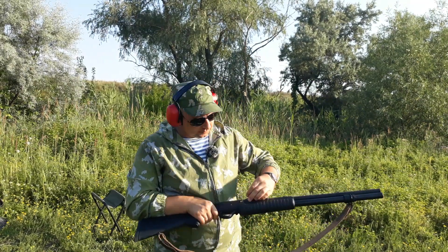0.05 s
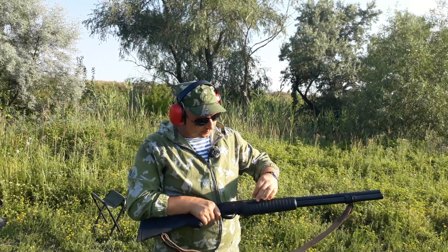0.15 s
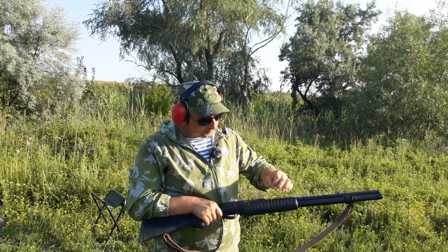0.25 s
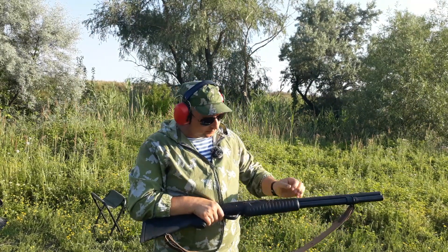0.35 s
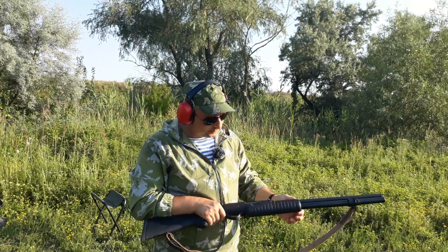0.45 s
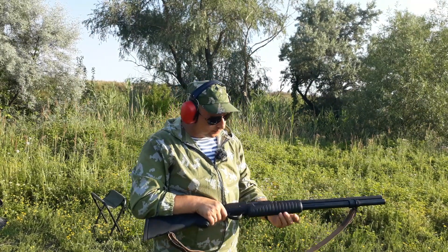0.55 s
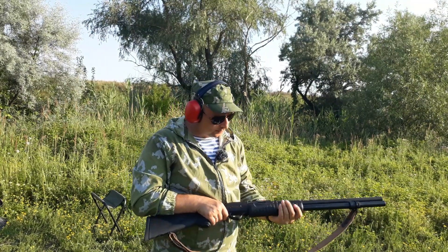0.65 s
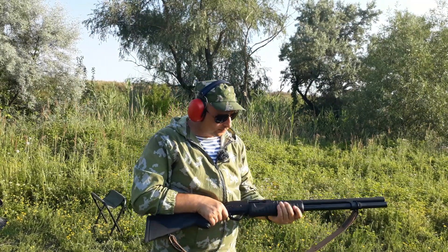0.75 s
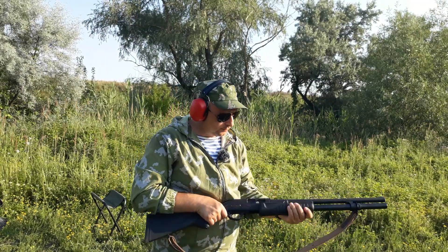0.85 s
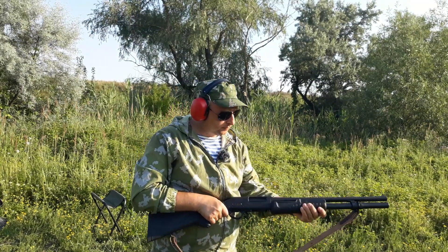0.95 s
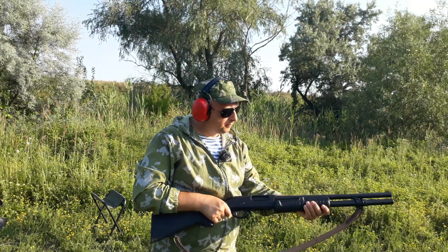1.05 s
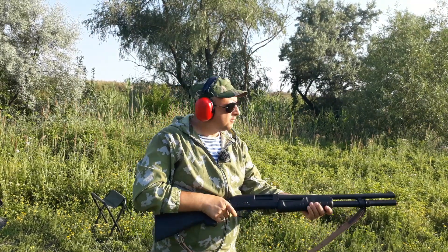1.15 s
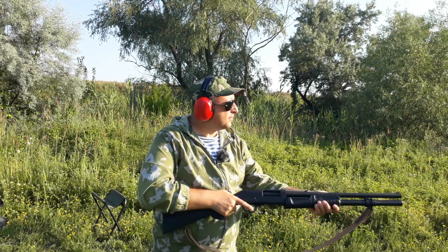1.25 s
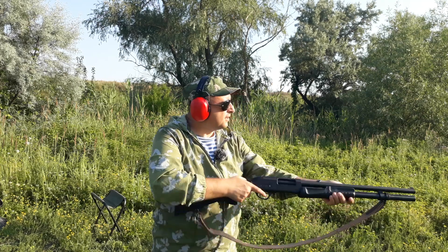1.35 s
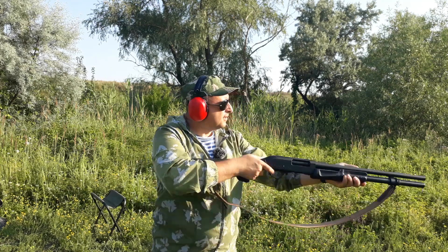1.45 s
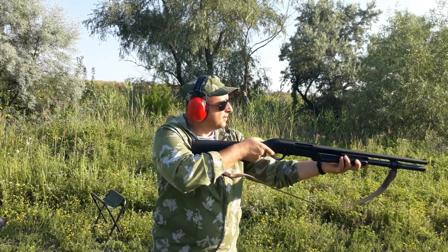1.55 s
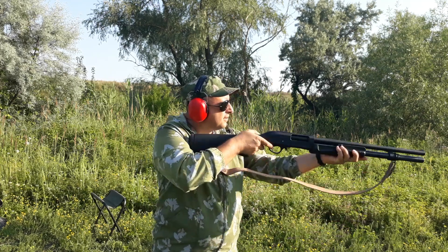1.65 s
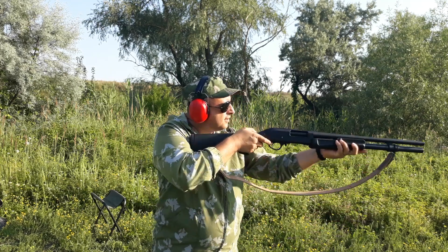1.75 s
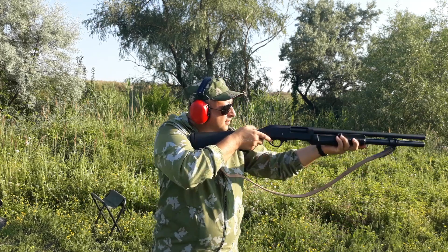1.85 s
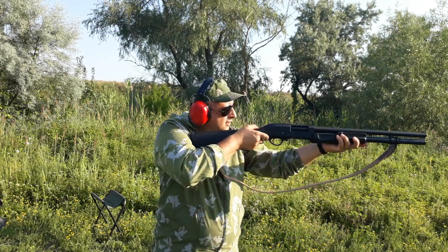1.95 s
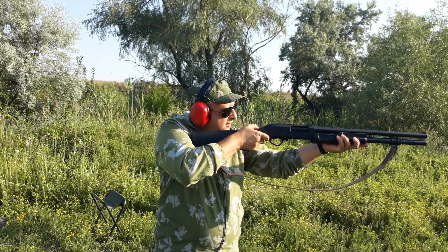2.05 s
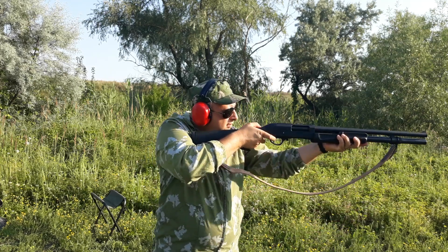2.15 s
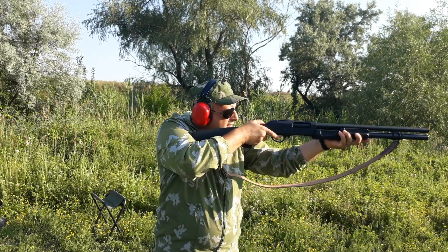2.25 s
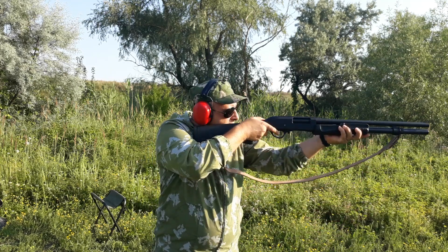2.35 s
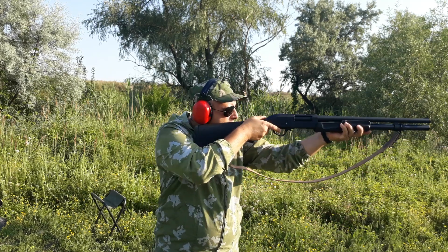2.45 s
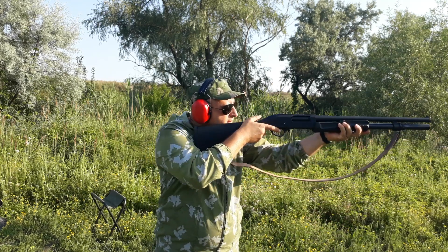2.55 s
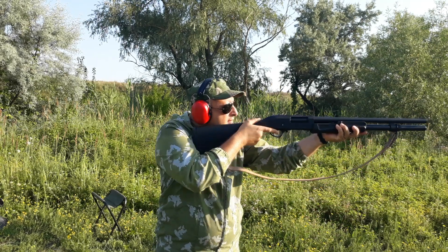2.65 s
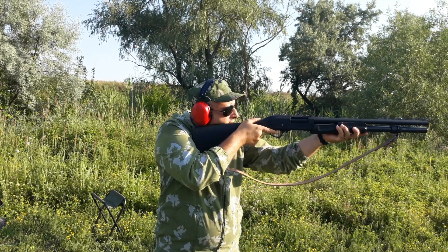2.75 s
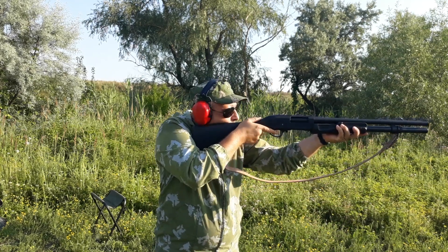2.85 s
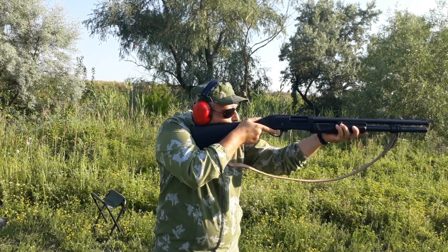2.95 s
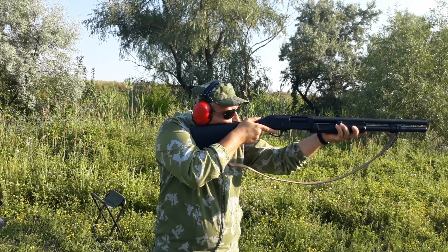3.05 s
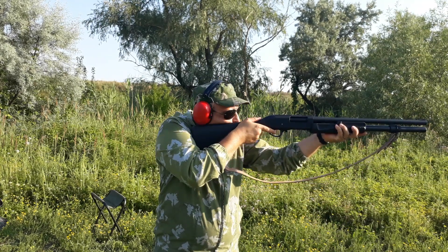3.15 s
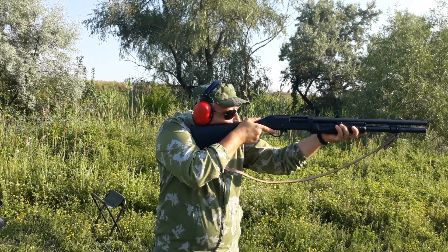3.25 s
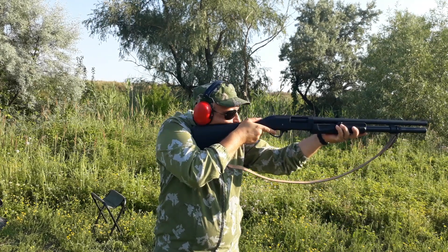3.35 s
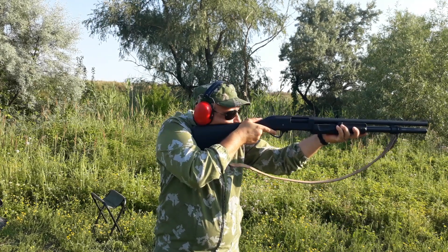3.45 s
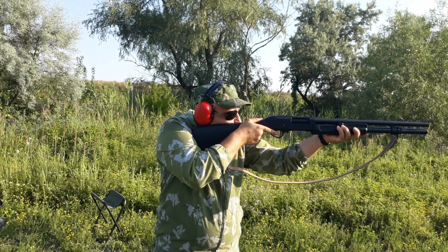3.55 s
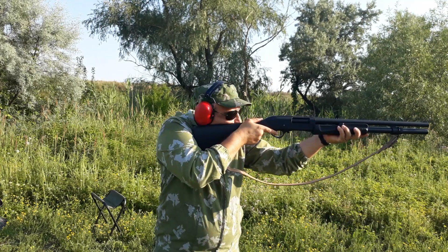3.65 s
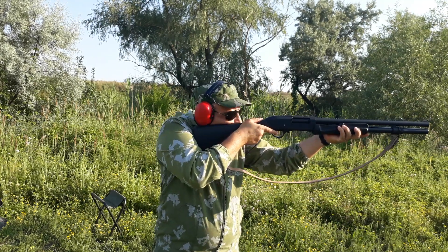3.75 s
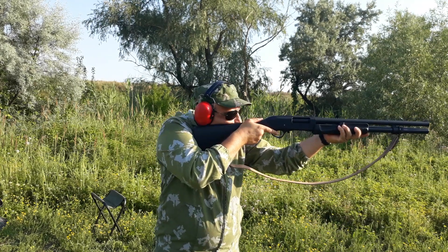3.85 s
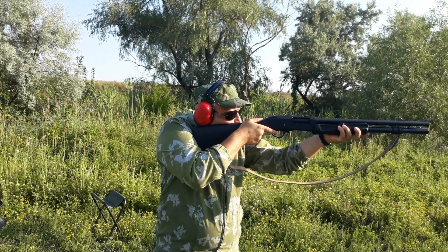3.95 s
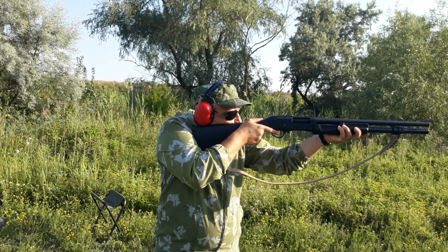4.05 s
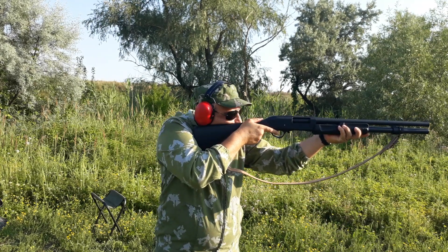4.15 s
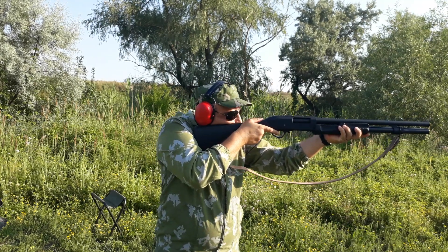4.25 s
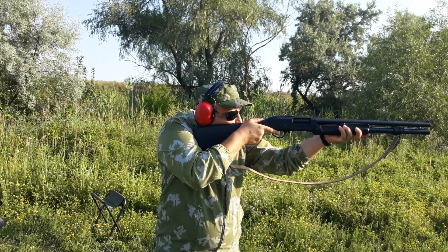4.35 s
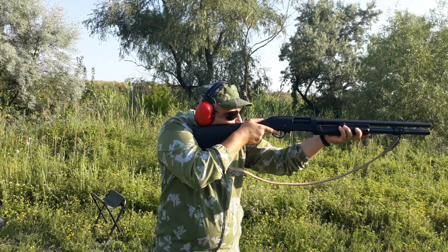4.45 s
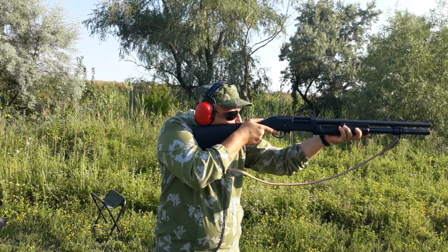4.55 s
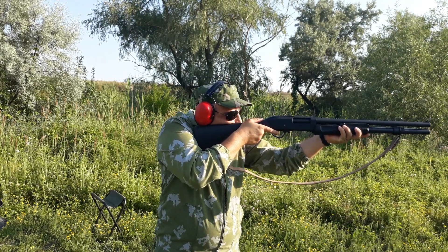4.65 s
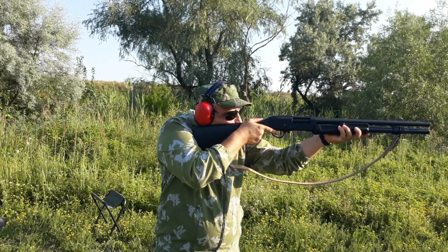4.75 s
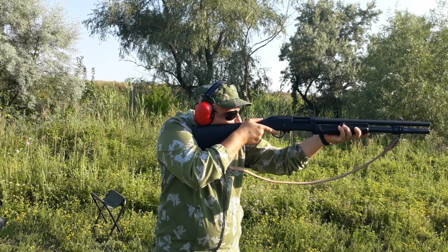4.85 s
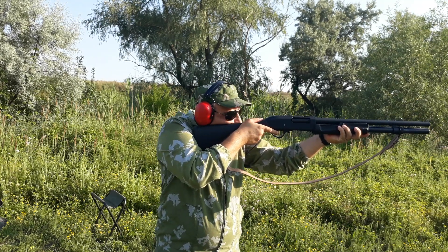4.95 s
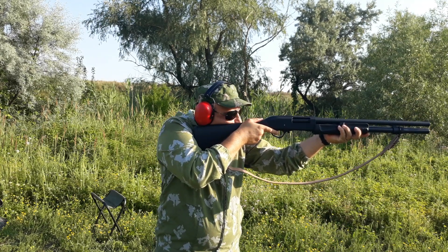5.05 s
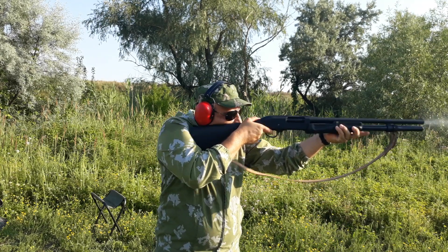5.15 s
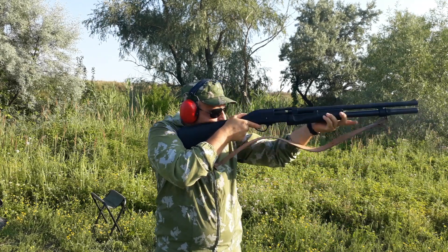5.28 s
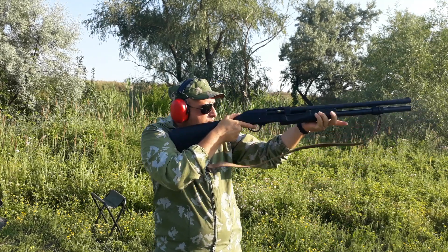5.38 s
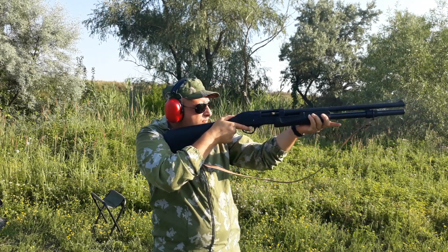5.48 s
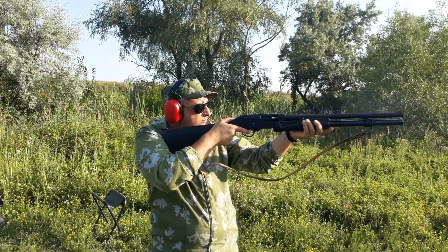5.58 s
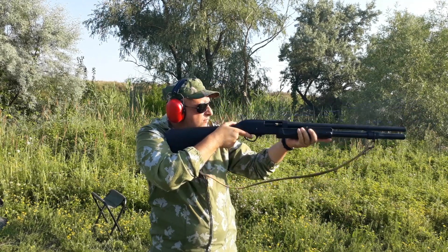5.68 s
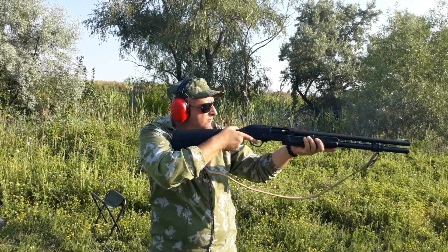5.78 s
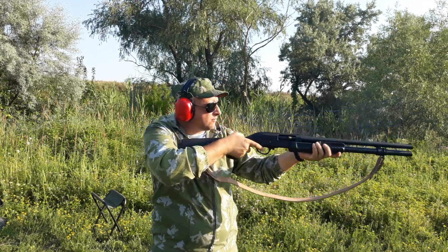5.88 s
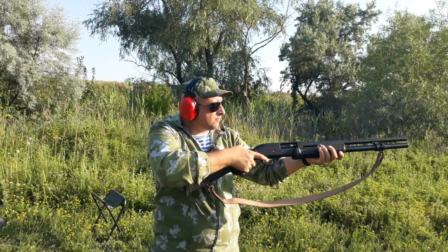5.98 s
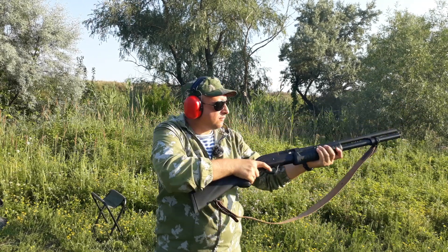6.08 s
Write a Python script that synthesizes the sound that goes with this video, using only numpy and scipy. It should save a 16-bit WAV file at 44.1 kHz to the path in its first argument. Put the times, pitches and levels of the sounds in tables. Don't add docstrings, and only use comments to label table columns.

```python
import sys
import numpy as np
from scipy import signal
from scipy.fft import rfft, irfft
from scipy.io import wavfile
from scipy.ndimage import uniform_filter1d

SR = 44100
rng = np.random.default_rng(int(sys.argv[2]) if len(sys.argv) > 2 else 0)


def dump(signal):
    limited = np.clip(np.atleast_2d(signal).T, -1, 1)
    pcm = np.round(limited * 32767).astype(np.int16)
    wavfile.write(sys.argv[1], SR, pcm)


def undo_db(level):
    steps = np.asarray(level, float) / 20
    return 10 ** steps


N = 269892

# f/Hz, width/Hz, level/dB
STEEL = [(580, 180, 1), (1158, 93, 1), (1682, 120, -4.5), (2016, 89, 4.5), (2230, 74, 7), (2770, 64, -13.5),
         (3998, 21.98, -10), (3690, 300, -4), (4478, 940, -4.5), (5720, 100, -21)]


def rms_one(x):
    return x / np.sqrt(np.mean(x ** 2) + 1e-20)


def peak_one(x):
    return x / np.max(np.abs(x))


def add(out, at, x):
    out[at:at + len(x)] += x[:N - at]


def span(rows):
    s, *columns = np.transpose(rows)
    at = np.arange(round(s[0] * SR), min(round(s[-1] * SR), N))
    return at[0], [np.interp(at / SR, s, c) for c in columns]


def swell(t, rise_s, hold_s, fade_db_per_s, rise_db):
    rise = rise_db * np.minimum(t, 0) / max(rise_s, 1e-4)
    fade = fade_db_per_s * np.maximum(t - hold_s, 0)
    return undo_db(rise - fade)


def band(x, low_hz, high_hz):
    return signal.sosfilt(signal.butter(2, [low_hz, high_hz], "band", fs=SR, output="sos"), x)


def coloured(x, spectrum):
    hz, db = np.transpose(spectrum)
    grid = np.fft.rfftfreq(len(x), 1 / SR) + 1
    gain = undo_db(np.interp(np.log(grid), np.log(hz), db))
    return rms_one(irfft(rfft(x) * gain, len(x)))


def resonance(x, hz, width_hz):
    r = np.exp(-np.pi * width_hz / SR)
    feedback = [1, -2 * r * np.cos(2 * np.pi * hz / SR), r * r]
    return signal.lfilter([(1 - r * r) / 2, 0, (r * r - 1) / 2], feedback, x)


def lumpy(size, rate, depth_db):
    r = np.exp(-2 * np.pi * rate / SR)
    slow = signal.lfilter([1], [1, -2 * r, r * r], rng.standard_normal(size + 4000))[4000:]
    return rng.standard_normal(size) * undo_db(depth_db * rms_one(slow))


def meadow():
    # f/Hz, level/dB per Hz
    air = [(12, -44), (20, -9.5), (27, -15), (120, -25), (249, -11), (378, -8), (743, -11.5), (938, -13),
           (1040, -12), (1130, -22), (1280, -15), (10000, -32.5), (13000, -65.5), (22000, -120)]
    # f/Hz, level/dB rms
    tones = [(247.6, -67), (500.6, -73.5), (748.3, -69.5), (1001, -77.5), (1071, -77), (1249, -77),
             (1427, -80.5), (2137, -84.5), (2250, -81), (2498, -87.5)]
    t = np.arange(N) / SR
    whine = np.zeros(N)
    for hz, db in tones:
        whine += undo_db(db + 3) * np.sin(2 * np.pi * (hz * t + rng.random()))
    return undo_db(-63.5) * coloured(lumpy(N, rate=4, depth_db=1.5), air) + whine


def cloth():
    # t/s, movement/dB, pressure on the capsule/dB
    jacket = [(0.0, -73, -3), (0.15, -67.5, 5), (0.22, -64.5, 20.5), (0.36, -53.5, -18), (0.62, -61.5, 3),
              (1.0, -62.5, 2.5), (1.1, -59.5, 16), (1.3, -71, -3.5), (1.6, -71.5, 1), (1.84, -55.5, 1.5),
              (2.01, -63.5, 5), (2.13, -60.5, 5.5), (2.35, -64.5, 9), (2.56, -62, 17), (2.69, -65.5, 3),
              (3.14, -75, 5.5), (5.2, -71.5, 3), (5.34, -66, 6)]
    # f/Hz, level/dB per Hz
    fabric_colour = [(88, -33), (150, -13), (514, -1.5), (1420, -11.5), (1620, -26.5), (1940, -17),
                     (3260, -28.5), (4180, -24), (8000, -44.5), (10400, -80), (17600, -120)]
    at, (rustle_db, press_db) = span(jacket)
    size = len(rustle_db)
    rub_db = rustle_db + press_db
    rumble_db = rustle_db + 0.3 * press_db + 3
    fabric = coloured(lumpy(size, rate=78, depth_db=2.5), fabric_colour)
    rub = rms_one(band(fabric, 200, 1100))
    rustle = rms_one(band(fabric, 1100, 4000))
    rumble = rms_one(band(lumpy(size, rate=14, depth_db=6), 40, 220))
    out = np.zeros(N)
    add(out, at, undo_db(rub_db - 0.23) * rub + undo_db(rustle_db + 1.2) * rustle + undo_db(rumble_db) * rumble)
    return out


def blows(rows):
    upper_hz = 723
    out, t = np.zeros(N), np.arange(4400) / SR
    tick_shape = peak_one(band(-np.exp(-((t - 0.0008) / 0.00013) ** 2), 570, 3200))
    for s, peak_db, hz, t60, tick_db in rows:
        fade = undo_db(-60 * (t / max(t60, 0.005)) ** 1.05) * (1 - np.exp(-t / 0.0013))
        swing = np.sin(2 * np.pi * hz * t)
        swing += 0.84 * np.exp(-t / 0.0039) * np.sin(2 * np.pi * upper_hz * t)
        ringing = resonance(resonance(rng.standard_normal(len(t)), hz, 221.5), hz, 221.5)
        linger = undo_db(-26.5 - 60 * t / 0.13) * rms_one(ringing)
        blow = peak_one(fade * swing + linger) + undo_db(tick_db + 0.5) * tick_shape
        add(out, round((s + 0.002015) * SR), undo_db(peak_db) * blow)
    return out


def chest_thumps():
    # t/s, peak/dB, ring f/Hz, 60 dB decay/s
    thumps = [(0.339, -31, 170, 0.027), (0.465, -29.5, 191, 0.068), (0.716, -38.5, 154, 0.056),
              (0.925, -33.5, 190, 0.036), (1.624, -42, 164, 0.036), (2.134, -36, 159.5, 0.033),
              (2.148, -36, 208, 0.035), (2.742, -50, 160, 0.033)]
    return blows([(*row, -5) for row in thumps])


def sling_knocks():
    # t/s, peak/dB, ring f/Hz, 60 dB decay/s, tick/dB
    sling = [(1.784, -42.5, 708, 0.02, -13), (1.796, -43, 522, 0.056, 6), (2.41, -42.5, 492, 0.043, -21),
             (2.493, -46, 602, 0.12, -19), (2.526, -33.5, 723, 0.017, -34.5),
             (2.557, -28.5, 431, 0.017, -14.5), (2.564, -1, 577, 0.033, -18), (2.598, -36, 560, .04, -31),
             (2.609, -23.5, 564, 0.03, -40), (2.654, -28.5, 537, 0.026, -32),
             (2.726, -40.5, 582, 0.022, -28), (2.877, -46.5, 591, 0.058, -20), (2.965, -6, 598, 0.031, -44),
             (4.354, -48.5, 578, 0.035, -15), (4.791, -45.5, 590, 0.036, -16.5),
             (5.246, -38, 592, 0.038, -16), (5.328, -37.5, 641, 0.056, -15)]
    return blows(sling)


def recoil_jolts():
    # t/s, peak/dB, ring f/Hz, 60 dB decay/s
    jolts = [(5.3561, -21, 560, 0.04), (5.514, -9.5, 828, 0.092), (5.537, -12, 657, 0.086),
             (5.559, -15, 502, 0.021), (5.571, -22, 626, 0.088), (5.633, -19.5, 750, 0.041),
             (5.644, -21.5, 735, 0.022), (5.668, -15.5, 663, 0.02), (5.692, -25, 520, 0.025),
             (5.702, -24.5, 676, 0.014), (5.729, -35, 604, 0.034), (5.825, -27.5, 527, 0.034),
             (5.846, -28.5, 667, 0.06), (5.859, -29.5, 505, 0.025), (5.875, -34, 700, .04),
             (5.99, -36.5, 550, 0.058), (6.017, -34.5, 442, 0.043), (6.049, -41, 597, 0.068)]
    return blows([(*row, -15) for row in jolts])


def steel(x, colour_db):
    modes = 0
    for k, (hz, width_hz, db) in enumerate(STEEL):
        modes = modes + (-1) ** k * undo_db(db + colour_db[k]) * resonance(x, hz, width_hz + 170)
    return band(modes, 340, 4500)


def slides():
    # t at full force/s, level/dB, build-up/s, hold/s, fade/dB per s
    strokes = [(0.166, -32, .001, 0.033, 600), (0.321, -39.5, .035, .001, 360),
               (0.386, -28, .001, 0.00054, 1703), (0.467, -53, .03, 0.043, 400),
               (0.521, -36.5, .015, 0.0059, 310), (1.013, -24.5, .012, .1, 600),
               (1.119, -19, .012, 0.0024, 1500), (1.132, -36, .005, .001, 950)]
    size = round(1.3 * SR)
    t = np.arange(size) / SR
    force = np.zeros(size)
    for s, db, rise_s, hold_s, fade in strokes:
        force += undo_db(db) * swell(t - s, rise_s, hold_s, fade, rise_db=26)
    grit = lumpy(size, rate=150, depth_db=4.5)
    evened_db = -0.4 * np.array(STEEL)[:, 2]
    song = rms_one(band(steel(grit, evened_db), 450, 2900))
    scrape = undo_db(-25) * band(grit, 2800, 8000)
    out = np.zeros(N)
    add(out, 0, force * (song + scrape))
    return out


def clacks(rows):
    out, t = np.zeros(N), np.arange(2600) / SR
    for s, peak_db, ring_hz, treble_db, chatter_s, thud_db in rows:
        chatter = np.exp(-(t / np.clip(chatter_s, 2e-4, 0.007)) ** 1.3) * np.minimum(t / 0.00031, 1)
        force = rng.standard_normal(len(t)) * chatter
        part = peak_one(band(resonance(force, ring_hz, 280), ring_hz / 2, ring_hz * 2))
        body = peak_one(steel(force, rng.normal(0, 3, len(STEEL))))
        snap = force * np.exp(-t / 0.002)
        crack = peak_one(band(resonance(snap, 4700, 2200), 2500, 8500) + 0.1 * band(snap, 3000, 10000))
        thud = peak_one(band(band(force, 200, 1300), 220, 2500))
        clack = undo_db(-2) * part + undo_db(-7.5) * body + undo_db(treble_db + 8.5) * crack + undo_db(thud_db) * thud
        add(out, round(s * SR), undo_db(peak_db) * clack)
    return out


def rattles():
    # t/s, peak/dB, loudest ring f/Hz, treble/dB, thud/dB
    loose = [(0.837, -24.5, 830, -35, -12), (0.924, -37, 2180, -26, 2), (0.955, -37.5, 900, -35, -9),
             (1.181, -41.5, 2000, -29, -8), (1.623, -52, 2093, -26, -10), (1.797, -40, 1390, -28, -24),
             (1.848, -40, 1980, -14.5, -11), (1.933, -46, 967, -24, -16), (1.968, -36, 930, -22.5, -23),
             (2.047, -19.5, 2010, -23.5, -1), (2.067, -46, 2090, -22, -11), (2.127, -41, 1025, -28, -12),
             (2.301, -42.5, 1400, -13.5, -14), (2.845, -49, 2150, -25, -16), (5.515, -6, 875, -24.5, -19),
             (5.524, -9.5, 2000, -26, -17), (5.826, -38, 3200, -16.5, -6)]
    chatter_s = 0.0036
    return clacks([(*row[:4], chatter_s, row[4]) for row in loose])


def loading():
    # t/s, peak/dB, loudest ring f/Hz, treble/dB, chatter/s
    contacts = [(0.1654, -11, 1014, -34, 0.0017), (0.2364, -21, 1780, -17, 0.0035),
                (0.261, -37, 1025, -18, 0.0026), (0.267, -34, 1780, -29, 0.0033),
                (0.284, -31.5, 1100, -28, 0.0022), (0.294, -25, 2100, -7, 0.0033),
                (0.3165, -19, 1830, -9.5, 0.003), (0.386, -21.5, 910, -15.5, 0.0058),
                (0.448, -30.5, 940, -20, 0.004), (0.464, -25, 1170, -25, 0.0071),
                (0.478, -24, 1830, -6.5, 0.0057), (0.488, -25, 1240, -12, 0.0026),
                (0.498, -26, 1830, -13, 0.0034), (0.525, -24.5, 2190, -16.5, 0.0029),
                (0.534, -26, 2180, -20, 0.0083), (0.547, -12, 1800, -13.5, 0.0027),
                (0.555, -18.5, 2170, -32, 0.0044), (0.569, -26, 2050, -18, 0.0045)]
    return clacks([(*row, -17) for row in contacts])


def racking():
    # t/s, peak/dB, loudest ring f/Hz, treble/dB, chatter/s
    contacts = [(1.005, -11.5, 2230, -24, 0.0031), (1.0194, -9.5, 2230, -24, 0.0028),
                (1.0232, -2.5, 2250, -30, 0.0029), (1.0337, -10.5, 2070, -26.5, 0.0032),
                (1.0395, -12.5, 2120, -27, 0.0054), (1.0435, -5, 2060, -22, 0.007),
                (1.056, -5.5, 1740, -8.5, 0.0038), (1.0604, -5, 1770, -23, 0.003),
                (1.068, -13.5, 1600, -21, 0.006), (1.0755, -4, 1614, -10.5, 0.0037),
                (1.086, -21, 1750, -34.5, 0.0047), (1.094, -15, 2000, -20, .004),
                (1.0987, -10, 1590, -12.5, 0.0059), (1.1105, -11, 2070, -11.5, 0.0045),
                (1.1175, -1, 2230, -13, 0.002), (1.1224, 3, 1500, -17.5, 0.0034)]
    middle_s = contacts[8][0]
    return clacks([(*row, -15.5 + 120 * (row[0] - middle_s)) for row in contacts])


def aftermath():
    # t/s, echo/dB, shaking/dB, smear/s per 10 dB
    returns = [(5.41, -20.5, -23, 0.04), (5.469, -28.5, -13.5, 0.0182), (5.523, -19, -11, 0.0085),
               (5.559, -36.5, -19.5, 0.04), (5.634, -42.5, -29, 0.02), (5.665, -46, -31.5, 0.01),
               (5.75, -59, -40, 0.3), (5.824, -54.5, -32.5, 0.03), (5.87, -61, -37, 0.01),
               (6.0, -60, -40.5, 0.14)]
    # f/Hz, level/dB per Hz
    echo_colour = [(700, -21), (1000, 8.5), (2000, 16.5), (4000, -1), (7000, -12.5), (10500, -21.5)]
    at = round(returns[0][0] * SR)
    size = N - at
    since = np.arange(size) / SR
    t = at / SR + since

    def waves(column, smear):
        total = np.zeros(size)
        for row in returns:
            s, smear_s = row[0], row[3]
            total += undo_db(row[column]) * swell(t - s, 0.7 * smear_s, 0.25 * smear_s, 10 / (smear * smear_s), 9.5)
        return total

    boom = rms_one(band(rng.standard_normal(size), 75, 230))
    boom_gain = undo_db(-18 - 470 * since) + undo_db(-6) * waves(1, smear=0.6)
    shaken = lumpy(size, rate=125, depth_db=3)
    jolt = rms_one(band(resonance(shaken, 506, 230) + resonance(shaken, 730, 240), 350, 1000))
    jolt_gain = undo_db(-6.5) * waves(2, smear=0.94)
    echo = coloured(lumpy(size, rate=59, depth_db=1.5), echo_colour)
    mid = rms_one(band(band(echo, 900, 3500), 900, 3500))
    mid_gain = waves(1, smear=0.92)
    treble = rms_one(band(echo, 3500, 11000))
    treble_gain = undo_db(-5 - 11.5 * since) * waves(1, smear=0.86)
    rise = np.minimum(since / 0.011, 1) ** 2
    out = np.zeros(N)
    add(out, at, rise * (boom_gain * boom + jolt_gain * jolt + mid_gain * mid + treble_gain * treble))
    return out


def blast():
    # t/s, level over the rail/dB, offset/rms units
    overload = [(5.3615, -31, 0.68), (5.364, 6, 0.089), (5.372, 20, 1.11), (5.383, 5, 0.45),
                (5.386, 7, 1.66), (5.408, -3, 1.9), (5.418, -4, 1.96), (5.43, -10.5, 0.29),
                (5.5, -19, 0.24)]
    at, (over_db, offset) = span(overload)
    since = np.arange(len(offset)) / SR
    top_hz = 2000 + (4600 - 2000) * np.exp(-(since / 0.0085) ** 2)
    white = rng.standard_normal(len(over_db))
    dull = rms_one(band(white, 186, 853))
    bright = rms_one(band(white, 230, 3640))
    share = np.clip((top_hz - 900) / 3600, 0, 1)
    roar = (1 - share) * dull + share * bright
    roar /= np.sqrt((1 - share) ** 2 + share ** 2 + share * (1 - share) * 1.12)
    pinned = np.clip(undo_db(over_db) * (roar + offset), -1, 1)
    pinned += undo_db(np.minimum(over_db, 0) - 25) * bright
    coupling = signal.butter(1, [149, 4000], "band", fs=SR)
    drained = signal.lfilter(*coupling, np.append(pinned, np.zeros(2000)))
    out = np.zeros(N)
    add(out, at, undo_db(-4.5) * drained)
    return out


def scene():
    touches = cloth() + chest_thumps() + sling_knocks() + recoil_jolts()
    gun = slides() + rattles() + loading() + racking()
    shot = aftermath() + blast()
    return (meadow() + touches + gun + shot)[None]


def roll_off(x):
    return signal.sosfilt(signal.butter(12, 15760, fs=SR, output="sos"), x)


def record(dry):
    capsule = signal.sosfilt(signal.butter(3, 75, "high", fs=SR, output="sos"), dry)
    link = signal.sosfilt(signal.cheby2(20, 75, 10700, fs=SR, output="sos"), np.tanh(capsule))
    loud = uniform_filter1d(np.abs(link), size=1024)
    hiss = rms_one(band(rng.standard_normal(dry.shape), 7000, 19000))
    hiss = undo_db(-76) / (1 + (loud / 0.02) ** 2) * hiss
    return roll_off(link + hiss)


dry = scene()
out = record(dry)
dump(out)
```